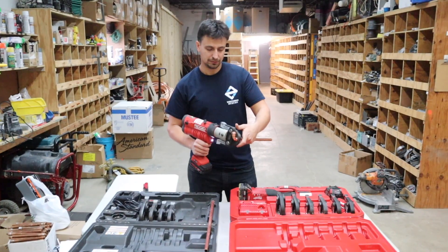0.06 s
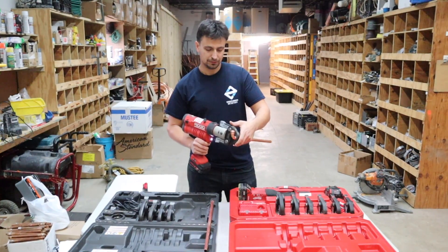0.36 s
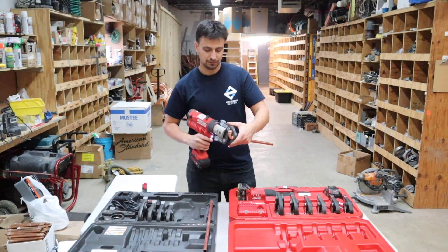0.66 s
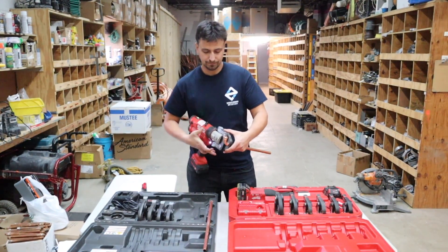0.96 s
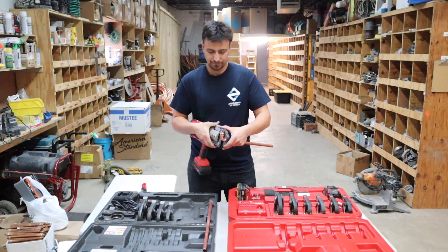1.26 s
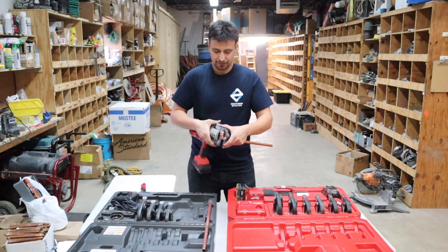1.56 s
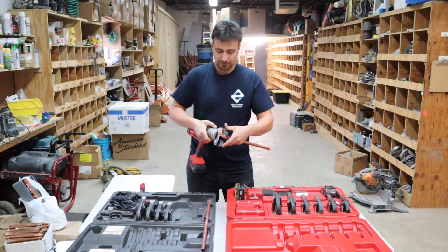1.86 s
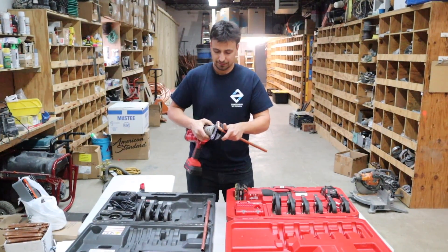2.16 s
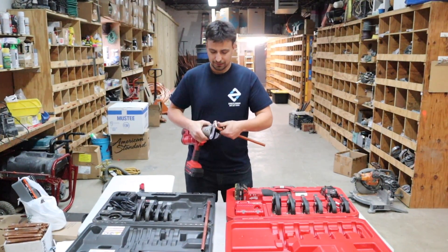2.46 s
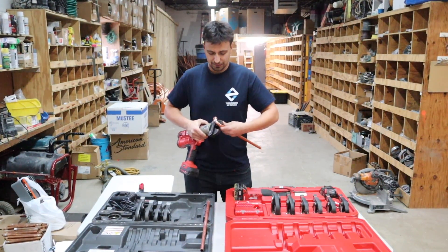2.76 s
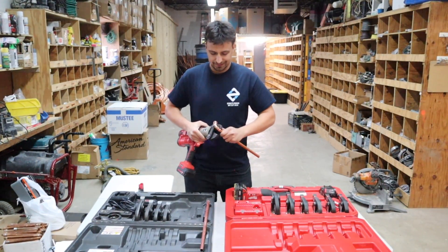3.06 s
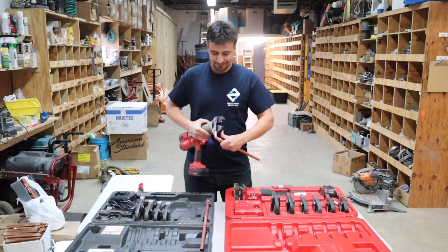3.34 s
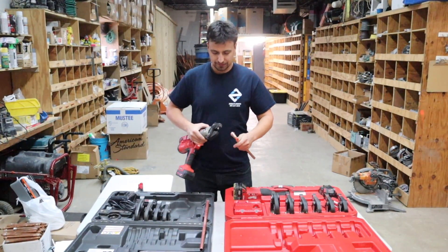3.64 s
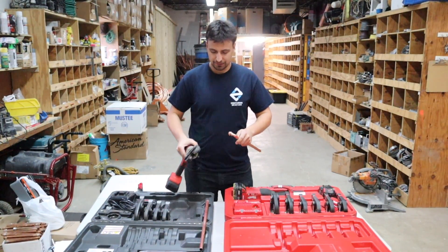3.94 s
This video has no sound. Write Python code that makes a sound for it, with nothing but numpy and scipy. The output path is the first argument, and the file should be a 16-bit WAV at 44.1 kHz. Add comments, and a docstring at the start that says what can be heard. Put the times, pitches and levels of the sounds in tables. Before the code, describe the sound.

A cordless press tool buzzes and cuts off, followed by faint clicks and a metallic clack.

```python
"""Pipe press in a workshop

One microphone, close to a cordless hydraulic press finishing a crimp on copper pipe in a long workshop.
The piston pump rattles and slows under load, the relief valve pops, the freed motor whines up and stops.
Hands shift on the tool, the steel jaws clack open and the pipe knocks its way out.
Farther off, the shelves scatter the sound back and the ventilation runs throughout."""
import sys
import numpy as np
from scipy import signal
from scipy.fft import rfft, irfft
from scipy.io import wavfile
from scipy.ndimage import uniform_filter1d

SR = 44100
rng = np.random.default_rng(int(sys.argv[2]) if len(sys.argv) > 2 else 0)


def materialize(psi):
    """Save the field psi as 16-bit PCM at rate SR to the path in sys.argv[1].

    A 1-D psi becomes a single channel; in a 2-D psi each row is a channel.
    """
    bounded = np.clip(np.atleast_2d(psi).T, -1, 1)
    quanta = np.round(bounded * 32767).astype(np.int16)
    wavfile.write(sys.argv[1], SR, quanta)


N = 176400
T = np.arange(N) / SR
VALVE_S, STOP_S, BRAKE_S = .403, .476, .018


def amp(db):
    """Decibels to gain."""
    return 10 ** (np.asarray(db) / 20)


def unit(x):
    """Scales to rms 1."""
    return x / np.sqrt(np.mean(x ** 2) + 1e-20)


def curve(points):
    """A control curve over the whole scene."""
    return np.interp(T, *np.transpose(points))


def read(points, hz):
    """Reads a spectrum on a log-frequency axis."""
    f, value = np.transpose(points)
    return np.interp(np.log(hz + 1), np.log(f + 1), value)


def add(mix, s, sound):
    """Mixes a sound in at time s."""
    part = mix[round(s * SR):][:len(sound)]
    part += sound[:len(part)]


def colour(x, points, tilt_db=0, size=4096):
    """Causal filter of unit energy with the given spectrum, tilted per octave."""
    hz = abs(np.fft.fftfreq(size, 1 / SR))
    log_gain = np.log(amp(read(points, hz) + tilt_db * np.log2(hz + 1)))
    taps = np.fft.ifft(np.exp(np.conj(signal.hilbert(log_gain)))).real  # minimum phase
    return signal.fftconvolve(x, taps / np.linalg.norm(taps))[:len(x)]


def noise(points):
    """Steady coloured noise of rms 1."""
    gain = amp(read(points, np.fft.rfftfreq(N, 1 / SR)))
    return unit(irfft(rfft(rng.standard_normal(N)) * gain, N))


def band(hz, width):
    """Noise in one resonance, rms 1; at 0 Hz, a random wander."""
    detuning = 2 * (np.fft.rfftfreq(N, 1 / SR) - hz) / width
    return unit(irfft(rfft(rng.standard_normal(N)) / (1 + detuning ** 2), N))


def burst(decay_s, size=4096):
    """The dense, quickly dying vibration of one contact."""
    return np.exp(-(T[:size] / decay_s) ** 1.03) * rng.choice([-1., 1.], size)


def ring(hz, decay_s):
    """One dying mode."""
    t = T[:SR // 2]
    return np.exp(-t / decay_s) * np.sin(2 * np.pi * hz * t)


def modes(table, waver=.49):
    """All modes of a struck part; loose contact makes each one waver."""
    out = 0
    for hz, db, t60 in table:
        polarity = rng.choice([-1, 1])
        chatter = unit(uniform_filter1d(rng.standard_normal(SR // 2), 200))
        out += amp(db) * ring(hz, t60 / np.log(1000)) * (polarity + waver * chatter)
    return out


def brake(s):
    """Full level until time s, then a quick fade."""
    return np.exp(-np.maximum(T - s, 0) / BRAKE_S)


def swell(s, width_s):
    """A bell-shaped rise and fall around time s."""
    return np.exp(-.5 * ((T - s) / width_s) ** 2)


# Pump speed: time_s, strokes_per_s
PUMP_SPEED = [(0, 56.3), (.395, 46.9), (.426, 53), (.452, 58.5), (.466, 59.8), (.48, 58), (.52, 35)]


def pump_strokes():
    """Running count of strokes: the pump sags under load and races once the valve opens."""
    return np.cumsum(curve(PUMP_SPEED)) / SR


# Knocks within each stroke: stroke_fraction, level_db
STROKE_KNOCKS = [(.21, -2.5), (.28, -2), (.39, -4), (.64, -.5), (.73, -5), (.83, -9)]


def piston(decay_s=.0017, spread_db=1.6, jitter_s=.00003, fresh_share=.33):
    """Each stroke repeats the same knocks, slightly varied, until the valve opens."""
    strokes, out = pump_strokes(), np.zeros(N)
    count = int(np.interp(VALVE_S, T, strokes)) + 1
    for fraction, db in STROKE_KNOCKS:
        repeated = burst(decay_s)
        for s in np.interp(np.arange(count) + fraction, strokes, T):
            late, strength = rng.standard_normal(2)
            blow = (1 - fresh_share) * repeated + fresh_share * burst(decay_s)
            if s < VALVE_S:
                add(out, abs(s + jitter_s * late), amp(db + spread_db * strength) * blow)
    return out


# Pump and gearbox close up, at light and at full load: frequency_hz, density_db
LIGHT_SPECTRUM = [(60, -48), (170, -19), (270, -24), (620, -17.5), (800, -7), (1350, 2.5), (2000, 1),
                  (3000, 0.5), (3450, 6.5), (4150, -5.5), (5500, 1.5), (6900, -16), (11500, -15),
                  (15500, -34.5)]
LOADED_SPECTRUM = [(60, -51), (170, -36), (300, -18), (620, -13.5), (900, -1), (1400, 1.5), (2000, -2),
                   (3000, -1), (3600, -1), (4150, -15.5), (5600, -2.5), (6900, -25), (11500, -20.5),
                   (15500, -28)]
# Housing resonances, rung by the pump: pitch_hz, width_hz, level_db
HOUSING_MODES = [(807, 22, -46), (1380, 45, -39), (2415, 70, -42), (3030, 60, -39), (3260, 80, -39),
                 (3480, 80, -43)]
# Shaking of the housing: pump_speed_multiple, level_db
HOUSING_SHAKE = [(2, -58), (5, -54), (9, -59), (10, -55), (12, -57), (13, -55), (15, -51), (17, -53),
                 (20, -51), (23, -46), (25, -46), (27, -44)]


def motor(grind_db=-18, light_db=-28.5, loaded_db=-26.5, free_db=-29.5):
    """Piston knocks and gear grind through the housing, then the hiss of the motor running free."""
    strokes, pumping = pump_strokes(), T < VALVE_S
    drive = piston() + amp(grind_db) * rng.standard_normal(N) * pumping
    drive /= np.std(drive[pumping])
    load = np.minimum(T / VALVE_S, 1)
    pump = (1 - load) * amp(light_db) * colour(drive, LIGHT_SPECTRUM)
    pump += load * amp(loaded_db) * colour(drive, LOADED_SPECTRUM)
    for hz, width, db in HOUSING_MODES:
        rung = np.gradient(signal.fftconvolve(drive, ring(hz, 1 / (np.pi * width)))[:N])
        pump += amp(db) * rung / np.std(rung[pumping])
    shake = sum(amp(db) * np.sqrt(2) * np.sin(2 * np.pi * (multiple * strokes + rng.random()))
                for multiple, db in HOUSING_SHAKE)
    free = amp(free_db) * colour(rng.standard_normal(N) * ~pumping, LIGHT_SPECTRUM)
    return (pump + shake * brake(VALVE_S) + free) * brake(STOP_S)


# Gear mesh, sagging under load and leaping when freed: time_s, pitch_hz, level_db
GEAR_MESH = [(0, 4910, -31), (.12, 4840, -30.5), (.195, 4770, -34), (.25, 4730, -46), (.417, 4700, -50),
             (.429, 4810, -31), (.451, 5230, -31), (.465, 5350, -28), (.478, 5325, -30), (.49, 5300, -40)]


def gear_whine(ripple=.017, wander=.004, slow_gear_db=-8, octave_db=-26):
    """The gear mesh and its octave over a slower gear, wobbling with each loaded stroke."""
    times, hz, db = np.transpose(GEAR_MESH)
    stroke_wobble = ripple * np.cos(2 * np.pi * pump_strokes()) * (T < VALVE_S)
    pitch = np.interp(T, times, hz) * (1 + stroke_wobble + wander * band(0, 360))
    phase = 2 * np.pi * np.cumsum(pitch) / SR
    gears = np.sin(phase) + amp(slow_gear_db) * np.sin(phase * 2 / 3) + amp(octave_db) * np.sin(2 * phase)
    return amp(np.interp(T, times, db)) * np.sqrt(2) * gears * brake(STOP_S)


# Air all around the microphone, and a distant low rush: frequency_hz, density_db
AIR_SPECTRUM = [(13, -70), (22, -27), (70, -15.5), (84, -7), (134, -2.5), (187, -9.5), (282, -15.5),
                (351, -14), (437, -20), (475, -19), (717, -19), (917, -19.5), (2090, -30.5), (4890, -40),
                (15500, -55)]
RUSH_SPECTRUM = [(50, -16), (92, 3), (128, 6.5), (185, 0), (300, -3.5), (430, 0.5), (585, 5.5), (670, -20),
                 (1300, -11.5), (2500, -50)]
# Resonances of the ventilation: pitch_hz, width_hz, level_db
VENT_DRONES = [(162.04, 2.5, -60.5), (877, 4.4, -76.5), (910, 3.3, -67)]
# Resonances within the rush: pitch_hz, width_hz, relative_db
RUSH_RESONANCES = [(98.85, 0.95, -8), (348.3, 4.8, -8.5), (415.8, 7.8, -11.5)]
# Rise and fall of the rush and of a low hum: time_s, level_db
RUSH_SWELL = [(0, -82), (1.7, -58), (2.4, -55), (3, -49.5), (3.5, -51), (3.8, -49.5), (4, -52)]
HUM_SWELL = [(0, -48), (.7, -56), (1.2, -51), (2.1, -57.5), (2.32, -48), (2.5, -54), (2.85, -49.5),
             (3.3, -57.5), (3.74, -43.5), (4, -55.5)]


def ventilation(air_db=-51, hum_hz=124.7, wander_hz=4.27):
    """Room tone: steady air noise and drones, a wavering hum and a distant rush that swells."""
    drone = sum(amp(db) * band(hz, width) for hz, width, db in VENT_DRONES)
    rush = noise(RUSH_SPECTRUM) + sum(amp(db) * band(hz, width) for hz, width, db in RUSH_RESONANCES)
    hum_pitch = hum_hz + wander_hz * band(0, 9.65)
    hum = np.sqrt(2) * np.sin(2 * np.pi * np.cumsum(hum_pitch) / SR)
    air = amp(air_db) * noise(AIR_SPECTRUM)
    return air + drone + amp(curve(RUSH_SWELL)) * rush + amp(curve(HUM_SWELL)) * hum


# Oil spurting through the valve: frequency_hz, density_db
SPURT_SPECTRUM = [(70, -18), (140, -2), (300, -3), (560, 3), (750, -10), (1200, -2), (2400, -20),
                  (8000, -50)]


def relief_valve(start_s=.4, push_hz=255, push_db=-18.5, spurt_db=-26, ring_hz=410, ring_db=-32):
    """The valve dumps the oil pressure: one low push, a spurt of oil and a brief hollow ring."""
    spread = (np.pi * push_hz * (T - start_s)) ** 2
    out = amp(push_db) * (2 * spread - 1) * np.exp(-spread)  # a single pressure pulse
    add(out, start_s, amp(spurt_db) * colour(burst(decay_s=.012), SPURT_SPECTRUM))
    t = T[:SR // 4]
    rise = t / .012  # the ring peaks after 12 ms
    add(out, start_s, amp(ring_db) * rise * np.exp(1 - rise) * np.sin(2 * np.pi * ring_hz * t))
    return out


# Grip and housing clicks: start_s, level_db, decay_s, pitch_hz, tilt_db_per_octave
GRIP_CLICKS = [(0.8398, -37, 0.0027, 2500, -0.5), (1.1328, -45.5, 0.0042, 3560, 1),
               (1.144, -51, 0.0022, 7040, 10), (1.4639, -41.5, 0.0034, 5100, 1),
               (1.724, -47, 0.0053, 2500, 5.5), (1.7354, -33, 0.0021, 2660, 0.5),
               (1.7407, -38, 0.0053, 2620, -2), (1.8255, -41, 0.0047, 2980, -3),
               (2.586, -40, 0.0031, 3340, -4)]
# Their colour close up: frequency_hz, density_db
CLICK_SPECTRUM = [(150, -19.5), (900, 2.5), (1700, 4), (3200, 2), (5700, -2), (8000, -16.5), (12000, -18.5),
                  (15000, -27)]


def grip_clicks(ring_db=-11, ring_s=.00057):
    """Small contacts on the grip and housing, each with a heavily damped ring."""
    out = np.zeros(N)
    for s, db, decay_s, hz, tilt_db in GRIP_CLICKS:
        add(out, s, amp(db) * colour(burst(decay_s), CLICK_SPECTRUM, tilt_db))
        body = np.gradient(ring(hz, ring_s))
        rung = signal.fftconvolve(burst(decay_s), body / np.linalg.norm(body))
        add(out, s, amp(db + ring_db) * colour(rung, CLICK_SPECTRUM))
    return out


# Hands sliding on the housing: centre_s, width_s, level_db
HAND_SLIDES = [(.886, 0.045, -68), (.971, 0.05, -67), (1.111, 0.036, -60.5), (1.301, 0.036, -65.5)]
# Their friction close up: frequency_hz, density_db
SLIDE_SPECTRUM = [(1000, -10), (3000, 14.5), (6000, 9.5), (9000, 2), (15000, 2.5)]


def sliding_hands(shift_db=-69):
    """Brief rubs on the housing, then a faint soft hiss as the grip shifts."""
    rubs = noise(SLIDE_SPECTRUM) * sum(amp(db) * swell(s, width) for s, width, db in HAND_SLIDES)
    return rubs + amp(shift_db) * band(hz=4800, width=2400) * swell(2.52, width_s=.13)


# Jaw clacks near the microphone: start_s, level_db, decay_s, tilt_db_per_octave
JAW_CLACKS = [(3.3191, -34, 0.0057, 0), (3.3497, -13.5, 0.0044, 1.5), (3.3689, -28.5, 0.0068, -4.5)]
# Colour of a blow on the jaws: frequency_hz, density_db
CLACK_SPECTRUM = [(200, -29), (420, -9.5), (1400, 3), (2500, 4), (3000, 8.5), (4000, 7.5), (4800, 2),
                  (6100, -2), (6700, -15), (9300, -19), (10300, -15), (11300, -18), (15500, -28)]
# Modes of the steel jaws: pitch_hz, level_db, t60_s
JAW_MODES = [(1270, -2, .28), (2083, -6, .4), (3015, -1, .36), (3655, -2, .24), (3817, -4, .42),
             (3940, -3, .35), (4339, -4, .38), (4942, -5, .4), (5798, -7, .42), (6072, -5, .4)]


def jaws(ring_db=-35):
    """The steel jaws snap open and ring faintly."""
    out = np.zeros(N)
    for s, db, decay_s, tilt_db in JAW_CLACKS:
        add(out, s, amp(db) * colour(burst(decay_s), CLACK_SPECTRUM, tilt_db))
        add(out, s, amp(db + ring_db) * modes(JAW_MODES))
    return out


# Pipe against the jaws: start_s, level_db, pitch_hz, ring_relative_db, modes_relative_db
COPPER_KNOCKS = [(3.545, -26.5, 2620, -1, -14), (3.584, -34.5, 3240, 0.5, -2), (3.588, -37.5, 2900, 5.5, 3),
                 (3.5925, -37.5, 5000, 1, -4)]
# Modes of the copper pipe: pitch_hz, level_db, t60_s
COPPER_MODES = [(1245, -4, .06), (2080, -7, .04), (3025, -2, .022), (3250, -2, .02), (3850, -6, .026),
                (4818, -3, .035), (5023, -8, .03), (6160, -10, .03), (8040, -16, .045), (12080, -12, .018),
                (12600, -12, .014), (14450, -11, .014)]


def pipe():
    """The pipe knocks on the jaws on its way out; each blow has its own ring and stirs the pipe's modes."""
    out = np.zeros(N)
    for s, db, hz, ring_db, modes_db in COPPER_KNOCKS:
        contact = colour(burst(decay_s=.0043), CLACK_SPECTRUM)
        ringing = amp(ring_db) * ring(hz, decay_s=.0067) + amp(modes_db) * modes(COPPER_MODES)
        add(out, s, amp(db) * contact)
        add(out, s, amp(db) * ringing)
    return out


# Decay of the long workshop: frequency_hz, t60_s
WORKSHOP_DECAY = [(150, .55), (600, .68), (1500, .72), (3500, .7), (5500, .6), (8000, .38), (14000, .26)]
# Colour of its reflections at the microphone: frequency_hz, level_db
WORKSHOP_COLOUR = [(100, 2.5), (1000, 3), (3500, -0.5), (6000, 3.5), (7500, 5.5), (15000, 1)]


def workshop(x, delay_s=.008, echoes_per_s=4000):
    """Scattered reflections from the shelves, each band dying at its own speed."""
    echoes = rng.standard_normal(SR) * (rng.random(SR) < echoes_per_s / SR)
    hz, t, bands = signal.stft(echoes, SR, nperseg=256)
    fall_db = -60 * t / read(WORKSHOP_DECAY, hz)[:, None]
    tail = signal.istft(bands * amp(fall_db + read(WORKSHOP_COLOUR, hz)[:, None]), SR)[1]
    mids = abs(rfft(tail, SR)[500:5000])
    tail /= np.sqrt(np.mean(mids ** 2))  # unit gain over 500-5000 Hz
    out = np.zeros(N)
    add(out, delay_s, signal.fftconvolve(x, tail)[:N])
    return out


def scene(tool_wet_db=-7.5, gear_wet_db=-13.5, hit_wet_db=-6.5):
    """Mono: tool and hands up close, the room behind; the hits send little top treble to the walls."""
    tool = motor() + relief_valve()
    gears = gear_whine()
    hits = jaws() + pipe() + sliding_hands() + grip_clicks()
    dulled = signal.lfilter(*signal.butter(2, 10500, fs=SR), hits)
    room = workshop(amp(tool_wet_db) * tool + amp(gear_wet_db) * gears + amp(hit_wet_db) * dulled)
    return (tool + gears + hits + room + ventilation())[None]


def record(dry, edge_hz=15750):
    """The recorder's band limit."""
    lowpass = signal.firwin(511, edge_hz, window=("kaiser", 9), fs=SR)
    return signal.oaconvolve(dry, lowpass[None], "same")


dry = scene()
out = record(dry)
materialize(out)
```